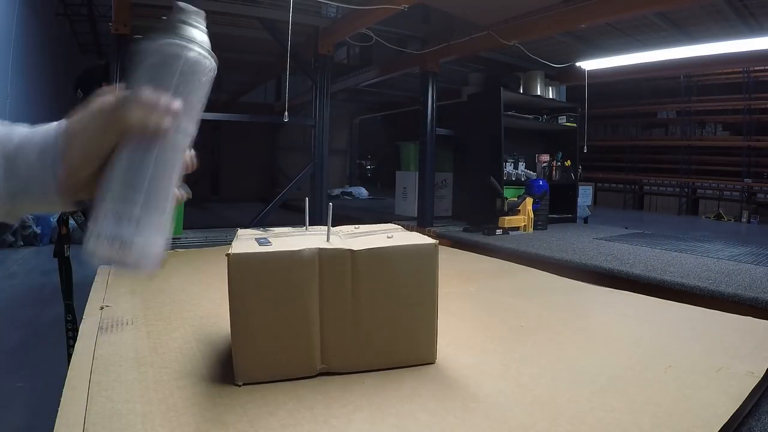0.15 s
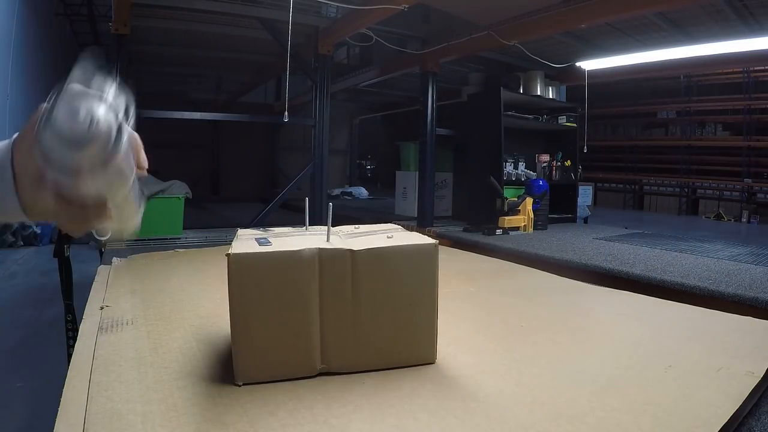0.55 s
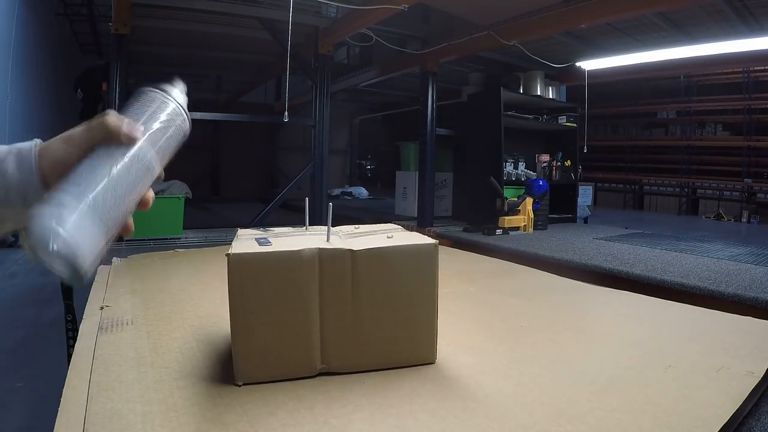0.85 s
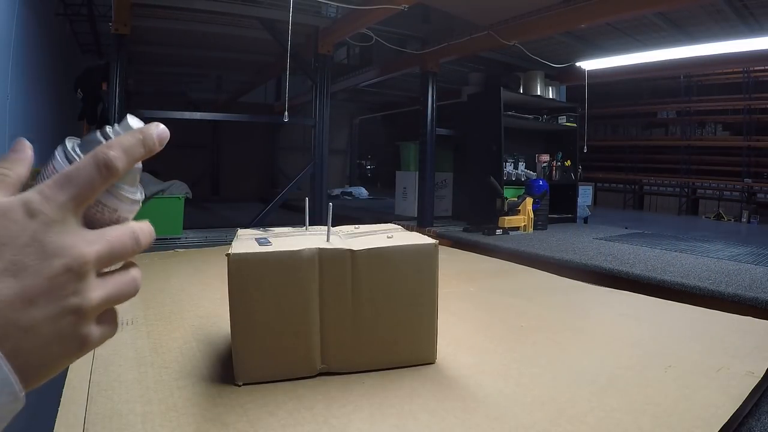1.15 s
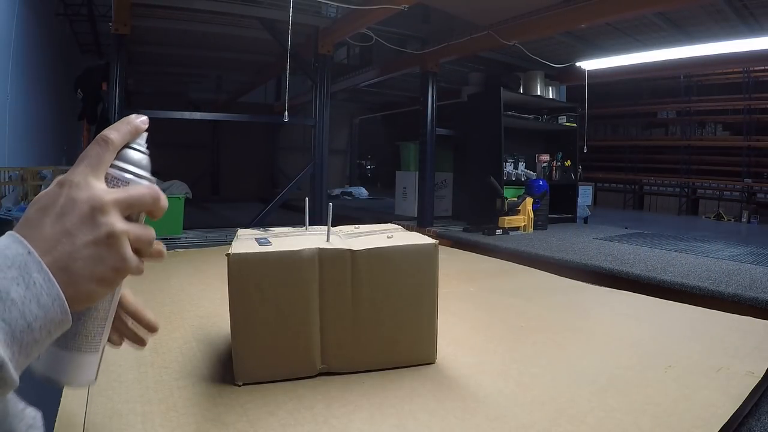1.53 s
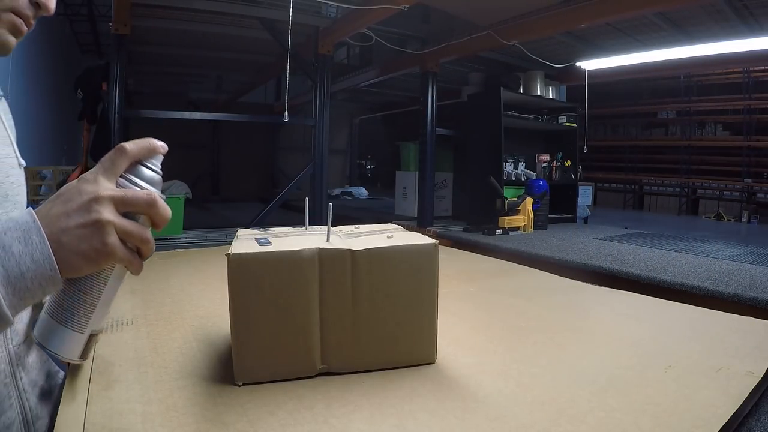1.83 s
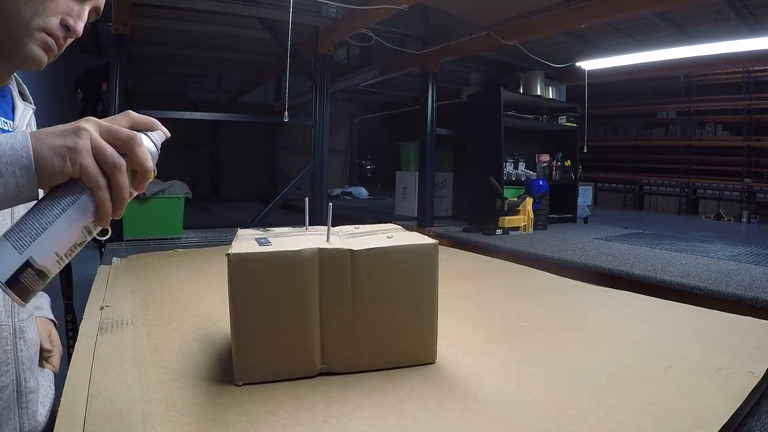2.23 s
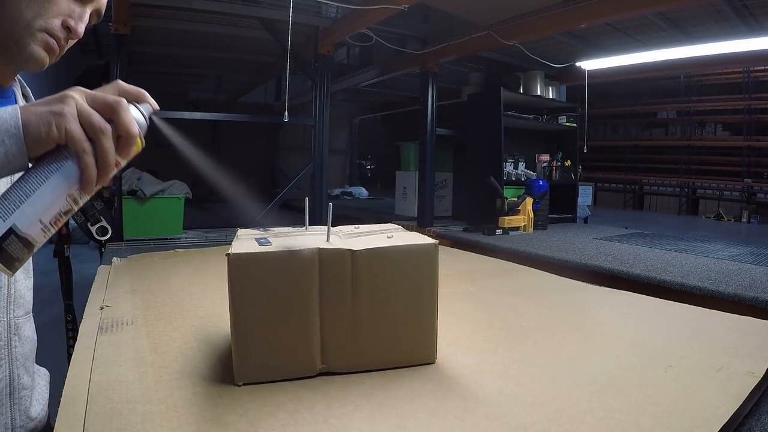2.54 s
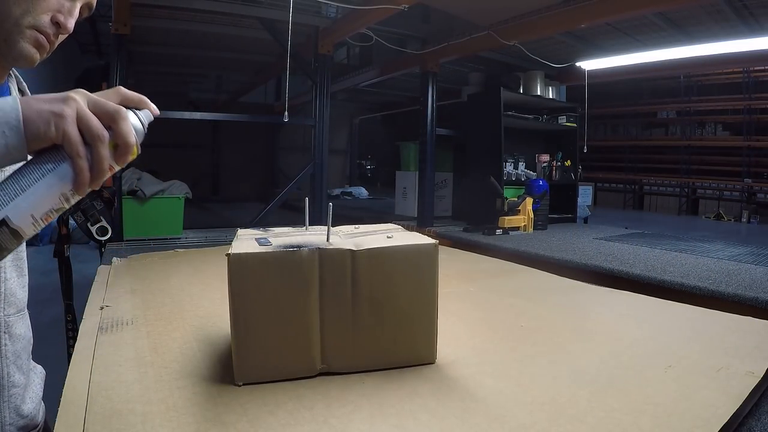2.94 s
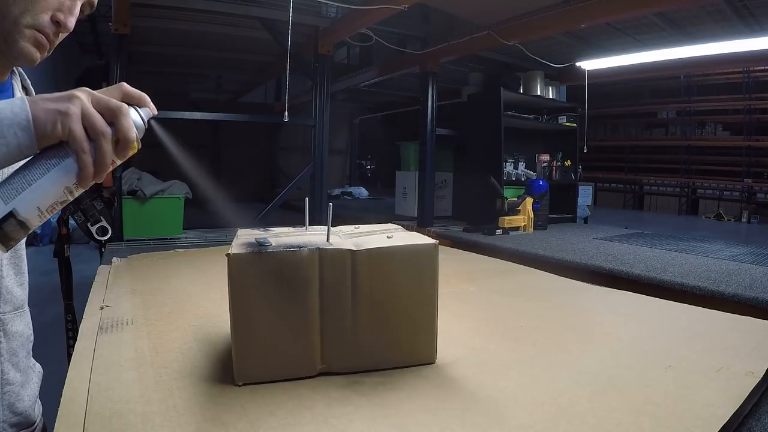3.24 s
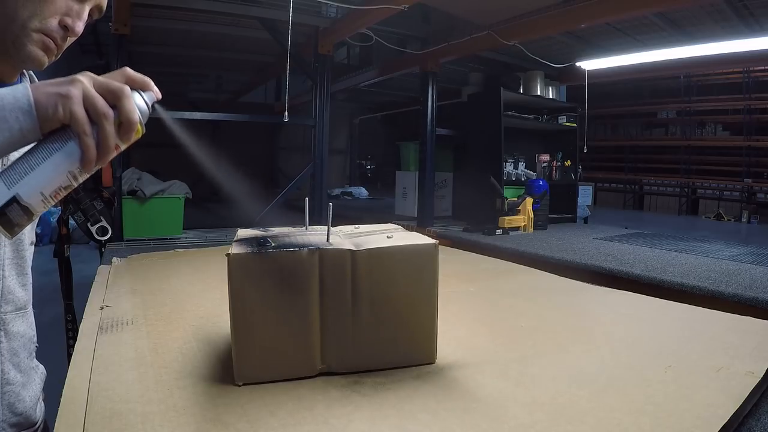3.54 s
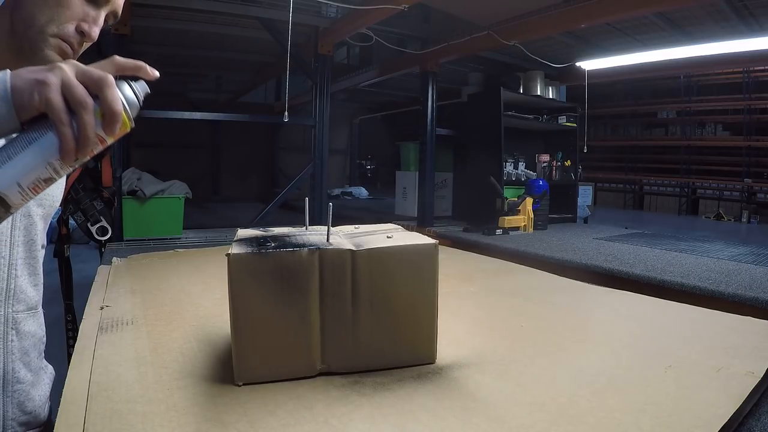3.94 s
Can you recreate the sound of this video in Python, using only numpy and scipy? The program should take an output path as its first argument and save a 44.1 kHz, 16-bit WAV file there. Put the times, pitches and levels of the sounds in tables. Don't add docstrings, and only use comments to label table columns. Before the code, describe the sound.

A close, mono small-camera microphone picks up a spray paint can in a large workshop. From 0 to about 1.1 s the can is shaken hard: a steel ball bangs the domed ends, rim and side in fast irregular clatter, bright and hard, the loudest blows clipping, with wet paint slosh and splash between. The blows are strongest in the first 0.6 s, then thin out. After a short gap, a last cluster of clacks falls at 1.4 s. From 1.5 to 3.1 s the ball rolls lightly, giving high, thin ticks and duller bottom knocks; a sleeve brushes softly around 2.0-2.3 s with a low bump. A short, bright puff of spray comes at 2.6-2.75 s, amid ticks, then a longer rough, airy hiss at 3.2-3.75 s, stopping abruptly. Faint ticks follow near 3.8 and 4.0 s. Low ventilation rumble, slight hum and hiss run throughout, with a faint hall tail.

```python
import sys
import numpy as np
from scipy import signal
from scipy.fft import rfft, irfft
from scipy.io import wavfile
from scipy.ndimage import uniform_filter1d, map_coordinates

SR = 44100
rng = np.random.default_rng(int(sys.argv[2]) if len(sys.argv) > 2 else 0)


def digitize_waveform(pressure):
    field = np.atleast_2d(pressure).T
    bounded = np.clip(field, -1, 1)
    quanta = np.round(bounded * 32767).astype(np.int16)
    wavfile.write(sys.argv[1], SR, quanta)


def ratio_of_db(decibels):
    return 10 ** (np.asarray(decibels, float) / 20)


N = 179833
T = np.arange(N) / SR

# freq_hz, density_db
RUMBLE_SPECTRUM = [(12, -37), (22, 10.5), (35, -2), (55, 0), (80, -8.5), (120, -11), (230, -21.5),
                   (382, -26), (549, -30.5), (788, -33.5), (1450, -45.5), (4000, -77), (15500, -81.5)]
# freq_hz, level_re_rumble_db
HUM_TONES = [(120, -17), (236, -21)]
# freq_hz, density_db
HISS_SPECTRUM = [(800, -4), (2000, -4.5), (5000, -8.5), (6300, -9), (8000, -7), (11000, -11.5),
                 (15500, -20)]
# freq_hz, density_db
CLOTH_SPECTRUM = [(100, 2), (500, 3), (1000, -0.5), (1400, -3.5), (2000, 4), (5000, 0.5), (9000, -3),
                  (15000, -8.5)]
# time_s, level_db
SLEEVE_LEVEL = [
    (1.98, -41.5),
    (2.02, -49),
    (2.1, -40.5),
    (2.16, -39),
    (2.19, -42.5),
    (2.21, -53),
    (2.3, -60),
    (2.38, -74),
]
# freq_hz, density_db
HALL_SPECTRUM = [(100, -6.5), (3000, 0.5), (5000, -3.5), (9000, -19.5), (15000, -33)]
BENCH_SPECTRUM = [(1000, -2.0), (5000, -1.5), (10000, -1.5), (15000, -5.0)]

# freq_hz, density_db
JET_SPECTRUM = [(470, -32), (800, -30.5), (1980, -22), (2380, -19.5), (3050, -22.5), (3540, -18.5),
                (4160, -17), (7010, -4), (9920, -1), (15500, -6.5)]
# time_s, jet_db
PUFF_VALVE = [
    (2.598, -70),
    (2.603, -28),
    (2.612, -12.5),
    (2.63, -17.5),
    (2.7, -15.5),
    (2.738, -19.5),
    (2.752, -27),
    (2.775, -80),
]
SPRAY_VALVE = [
    (3.192, -86),
    (3.197, -36),
    (3.208, -25.5),
    (3.215, -14),
    (3.3, -19),
    (3.4, -19),
    (3.718, -18.5),
    (3.735, -41),
    (3.76, -76),
]

# freq_hz, level_db, t60_s
WALL_LOW_MODES = [(4494, 6, 0.0085), (4466, -8, 0.041), (4590, -6.5, 0.024), (4220, -18.5, 0.023),
                  (4770, -12, 0.03), (6350, -19.5, 0.012)]
WALL_MID_MODES = [(8050, 19, 0.0076), (7880, -3.5, 0.05), (7950, -7.5, 0.13), (8260, -2, 0.045),
                  (12200, 0.5, 0.03), (12050, -9, 0.016), (13280, -4.5, .02)]
WALL_HIGH_MODES = [(9200, 4, 0.0066), (9280, -3, 0.047), (9060, -9, .03), (10000, -12, 0.028),
                   (10400, -13.5, 0.02), (13600, -14, 0.018)]
# freq_hz, level_db, t60_s
BELLY_MODES = [(2950, 0, 0.047), (2805, -1, 0.032), (3100, -17, .03)]
# freq_hz, level_db, t60_s
BODY_HELD_MODES = [(1400, -10, 0.03), (1700, -6, .02), (1950, 7, 0.026), (2135, 4, 0.022), (2350, 0, 0.014),
                   (2800, 1, 0.014), (5300, 0, 0.008)]
# freq_hz, density_db
RASP_SPECTRUM = [(800, -12), (2000, -2.5), (3500, 0), (5500, 0), (8000, -1), (12000, -4), (15000, -9)]
# start_s, low_ring_db, mid_ring_db, high_ring_db
TICKS = [(1.4058, -19, -20, -15), (1.5561, -16, -14, -10.5), (1.6054, -17, -11.5, -16.5),
         (1.6613, -21.5, -15.5, -23), (1.7042, -20.5, -18.5, -16), (1.784, -11.5, -28, -20),
         (1.7882, -34, -35, -32), (1.7953, -43, -33, -31), (1.8503, -18, -22, -27.5),
         (1.8602, -43, -30, -35), (1.8982, -22.5, -18, -24), (1.906, -42, -23, -38),
         (1.932, -25, -15, -31.5), (1.9666, -22, -19.5, -32.5), (2.0061, -10, -18, -14.5),
         (2.091, -16.5, -21, -20.5), (2.101, -26, -34, -32), (2.1256, -28, -30, -22),
         (2.136, -32, -38, -38), (2.151, -30.5, -34, -35), (2.1652, -41, -40, -42), (2.174, -42, -45, -45),
         (2.227, -54, -48, -51), (2.234, -52, -46, -50.5), (2.262, -56, -51, -50), (2.29, -56, -50, -50),
         (2.318, -51, -49.5, -50), (2.352, -56, -54, -55), (2.4292, -16, -9.5, -9.5),
         (2.4889, -36, -54, -46.5), (2.569, -17, -11.5, -13), (2.5725, -26, -27, -24),
         (2.578, -32, -27, -26), (2.6696, -33, -10, -27), (2.7214, -18, -12, -33), (2.791, -22, -19, -17.5),
         (2.7948, -39, -24, -23.5), (2.8553, -23.5, -19.5, -17), (2.9097, -20, -22, -18.5),
         (2.969, -30, -29, -21.5), (3.0217, -32, -30, -29.5), (3.0467, -39, -38, -35.5),
         (3.826, -44, -39.5, -53.5), (3.9935, -39, -39.5, -47), (4.0053, -39, -41, -58)]
# start_s, body_db, wall_rings_db
KNOCKS = [(1.6894, -19.5, -22.5), (1.7805, -34, -32), (2.0064, -18, -43), (2.044, -32, -32),
          (2.0562, -32, -37), (2.424, -12.5, -13), (2.5333, -23, -22.5), (2.5922, -23, -22),
          (2.6919, -20.5, -26), (2.77, -23.5, -20.5), (2.829, -24, -29), (2.879, -29, -43),
          (2.95, -29, -35), (2.9783, -31, -29), (3.0111, -32.5, -36), (3.032, -38.5, -50),
          (3.051, -37, -46), (3.066, -42.5, -54), (3.0758, -38, -39), (3.11, -51, -52),
          (3.1975, -28.5, -45.5), (3.809, -45.5, -55), (3.9813, -41.5, -61)]

# multiple_of_ring, level_db, t60_s
DOME_MODES = [(1, 12, 0.0054), (1.005, -13.5, 0.035), (1.1, -14.5, 0.025), (.91, -24.5, 0.13)]
# freq_hz, level_db, t60_s
BODY_SHAKEN_MODES = [(1188, -22.5, 0.16), (1348, -2, 0.028), (1576, 3.5, 0.017), (1876, 14.5, 0.011),
                     (2073, 5.5, 0.0055)]
# freq_hz, level_db, t60_s
CONTACT_MODES = [(5250, -3, 0.0034), (7840, 3, 0.0038), (11600, -8, 0.0012)]
# multiple_of_dent_pitch, level_db, t60_s
DENT_MODES = [(1, 0.5, 0.0061), (1.7, -1, 0.0022), (2.9, -6.5, 0.0011)]
# freq_hz, level_db, t60_s
THUD_MODES = [(331, -3, 0.0098), (500, 0, 0.0097), (810, -2.5, .007), (1333, 2.5, 0.025)]
# freq_hz, density_db
CRACK_SPECTRUM = [(300, -36.5), (900, -8.5), (2500, 5), (5000, 7.5), (8000, -10.5), (11000, 2),
                  (15000, -10)]
# freq_hz, density_db
SLOSH_SPECTRUM = [(300, -16.5), (900, -20.5), (1800, 0), (3100, 3), (4500, 0), (6500, -3.5), (9000, -21),
                  (15000, -57)]
# freq_hz, density_db
SPLASH_SPECTRUM = [(2500, -34), (5000, -10.5), (8000, -2), (11500, -4), (15000, -14)]
# start_s, dome_ring_hz, strength_db, body_db
SQUARE_HITS = [(.0756, 3160, -7.5, -31.5), (.0874, 3100, -4, -16), (.1695, 3210, 2, -26),
               (.287, 3650, -8, -17), (.4054, 3180, 1, -25), (.5339, 3000, -6, -31),
               (.5957, 3510, -17, -34), (.6124, 3100, -10.5, -45), (.736, 3100, -21, -36),
               (.7493, 3590, -14, -20.5), (.7779, 3670, -22, -24), (.8117, 2960, -19.5, -25),
               (.8743, 3140, -0.5, -15.5), (1.0556, 3070, -15.5, -26.5)]
# start_s, dome_ring_hz, strength_db, body_db
REBOUNDS = [(0.1846, 3135, -8.5, -36), (0.19, 3100, -38, -35), (0.4187, 3110, -7, -33),
            (0.6284, 3180, -12, -22.5), (0.6373, 2950, -19.5, -36), (0.644, 2900, -24, -31),
            (0.66, 3100, -26, -47), (0.7561, 3100, -17, -20.5), (.925, 3020, -12, -30),
            (0.9351, 2940, -12, -35), (0.9732, 4100, -27, -28)]
# start_s, dome_ring_hz, strength_db, body_db
RIM_HITS = [(0.0837, 3770, -2.5, -12.5), (0.1136, 2980, -12, -43), (0.1398, 3340, -17, -22.5),
            (0.1522, 2720, -21, -37.5), (0.2001, 3530, -4.5, -26), (0.217, 3100, -15, -48),
            (0.2643, 3190, -3.5, -19.5), (0.269, 2950, -15, -27), (0.3281, 4100, -11, -28),
            (.364, 3330, -9.5, -26), (0.4029, 3250, -19, -25), (0.4278, 3120, -22, -34),
            (0.433, 3100, -17.5, -36.5), (0.45, 3100, -10, -28), (.495, 3650, -5, -41.5),
            (0.5145, 3600, -14, -22), (0.5328, 3040, -12, -23), (0.5643, 3900, -22, -30),
            (.58, 4070, -21, -31), (.59, 3220, -21, -27), (0.7052, 2560, -19, -24.5),
            (0.8338, 3270, -22, -40), (0.8613, 3030, -26, -47), (0.8924, 2970, -12.5, -17),
            (0.9555, 4400, -13, -22), (0.9671, 3880, -22, -35), (1.0045, 3080, -18.5, -32),
            (1.4039, 3040, -9, -22), (1.4165, 2900, -25, -35)]
# start_s, dome_ring_hz, strength_db, body_db
SIDE_HITS = [(0.0466, 2380, -9, -17), (0.0779, 3320, -4.5, -39), (0.1291, 2860, -6.5, -29),
             (.146, 3900, -12, -31), (.2063, 3260, -10, -25), (.2128, 3160, -12, -40),
             (0.2276, 4120, -15, -24), (0.2571, 3650, -7.5, -26), (0.3539, 3320, -15, -31),
             (0.3745, 3400, -8.5, -39), (0.388, 2980, -8, -32), (.464, 3260, -10, -24),
             (0.507, 3630, -3, -32.5), (0.689, 4330, -10.5, -30), (0.7259, 3940, -9.5, -22),
             (0.7945, 2390, -9.5, -22), (0.824, 3020, -16, -41), (0.853, 3550, -16.5, -24),
             (0.9, 2950, -12, -21), (1.0946, 2290, -10.5, -23), (1.127, 2960, -31, -40),
             (1.39, 2440, -11.5, -22), (1.463, 4400, -20, -26)]
# dome_db, crack_db, patter_db
LANDING_OFFSETS = [
    (-1.15, -12, -34.5),
    (1.5, -25, -31),
    (-3.6, 0.4, -35.5),
    (-15, -0.5, -33.5),
]
# start_s, peak_db, dent_pitch_hz
DENTS = [(0.0765, -8, 3230), (0.0807, -5, 5370), (0.1137, -19, 2670), (0.129, -3.5, 4600),
         (0.1403, -9, 3300), (0.1462, -10, 7900), (0.1527, -22, 2840), (0.1775, -28, 3100),
         (0.2068, -10, 3750), (0.2173, -17, 2890), (0.2278, -12, 3570), (0.2573, -12, 10980),
         (0.27, -5, 3830), (0.2741, -20, 3190), (0.296, -24, 3660), (0.3208, -16, 2640),
         (0.3747, -11, 4050), (0.3882, -9, 8100), (0.3957, -19, 2280), (0.4289, -17, 3490),
         (0.495, -8, 4100), (0.4992, -18, 3450), (0.5072, 1.5, 7630), (0.5142, -13, 3600),
         (0.5325, -0.5, 3600), (0.5386, -16, 3100), (0.5806, -23, 3700), (0.584, -27, 3320),
         (0.5958, -13, 4130), (0.5998, -19, 2610), (0.6124, -7.5, 3080), (0.69, -10.5, 3620),
         (0.6993, -15, 3790), (0.705, -27, 1800), (0.7283, -13, 3100), (0.7355, -19, 3960),
         (0.7388, -15, 3450), (0.743, -14, 4050), (0.7496, -6.5, 3300), (0.7952, -10, 4260),
         (0.8249, -23, 3450), (0.8328, -14, 5510), (0.852, -11.5, 3450), (0.9556, -4, 4200),
         (0.961, -13, 3530), (0.9669, -6.5, 3750), (0.972, -20, 4010), (0.9778, -13, 4480),
         (1.004, -23, 3450), (1.0959, -10.5, 7800), (1.4047, -2.5, 3100), (1.409, -10, 8050),
         (1.4189, -18, 2370)]
# start_s, thud_db
JOLTS = [(0.047, -28), (.076, -43), (.084, -28.5), (.1696, -31), (0.2648, -34.5), (0.4072, -33),
         (0.4181, -31), (0.496, -40), (0.5073, -22.5), (0.534, -39), (0.745, -36), (1.0953, -26),
         (1.3905, -34), (1.4043, -31)]
# start_s, slosh_db, splash_db
SURGES = [(.0002, -29, -24), (.024, -31, -34.5), (0.0748, -14, -32.5), (.0834, -37, -35),
          (.1695, -29, -50.5), (.1998, -20, -17.5), (0.2635, -27, -46), (0.288, -18, -42),
          (.3279, -35, -32), (.374, -30.5, -33), (.4284, -26, -30), (0.449, -31, -21), (.495, -40, -22),
          (0.506, -34, -22), (0.514, -29, -42), (0.532, -20, -31), (.58, -40, -27), (0.61, -26, -53),
          (0.664, -34, -37), (.674, -32, -29), (0.6872, -30, -23.5), (0.7054, -48, -37),
          (0.735, -25.5, -20.5), (.7485, -25.5, -48), (0.7776, -26, -31), (.7937, -40, -33),
          (0.8106, -24, -27.5), (0.8723, -27, -31), (0.956, -18.5, -36), (0.966, -33, -22.5),
          (1.3895, -34, -30), (1.4035, -29, -27), (1.414, -37, -32), (1.463, -36, -31)]


def noise(spectrum, size=N):
    hz, db = np.transpose(spectrum)
    f = np.maximum(np.arange(size // 2 + 1) * SR / size, 1)
    gain = ratio_of_db(np.interp(np.log(f), np.log(hz), db))
    y = irfft(rfft(rng.standard_normal(size)) * gain, size)
    return y / y.std()


def curve(table):
    time_s, level_db = np.transpose(table)
    return np.interp(T, time_s, level_db)


def walk(rate_hz):
    hold = int(SR / rate_hz)
    steps = np.repeat(rng.standard_normal(N // hold + 1), hold)
    return 0.653 * uniform_filter1d(steps, hold)[:N]


def fade(t, t60_s):
    return np.exp(-np.log(1000) * t / t60_s)


def rings(start_s, level_db, modes, scale=1, detune=0.013, scatter_db=5.0, rise_s=0.00028, flutter_db=5.5,
          sag=0, size=2048):
    out, t = np.zeros(N + size), np.arange(size) / SR
    hz, mode_db, t60_s = np.transpose(modes)[:, :, None]
    sag_s = 0.0023
    bent_s = t + sag * sag_s * (1 - np.exp(-t / sag_s))
    chance = rng.standard_normal((len(start_s), len(modes), 2 + size // 64))
    for s, db, k, c in zip(start_s, level_db, scale * np.ones(len(start_s)), chance):
        flutter = uniform_filter1d(np.repeat(c[:, 2:], 64, axis=1), 64, axis=1)
        flutter *= np.minimum(t / 0.0011, 1)
        gain = ratio_of_db(mode_db + scatter_db * c[:, :1] + flutter_db * flutter) * fade(t, t60_s)
        mode_hz = k * hz * (1 + detune * c[:, 1:2])
        ring = (gain * np.sin(2 * np.pi * mode_hz * bent_s)).sum(axis=0)
        ring *= (1 - np.exp(-t / rise_s)) * (1 - (t / t[-1]) ** 2)
        first = int(s * SR)
        out[first:first + size] += ratio_of_db(db) * ring / np.abs(ring).max()
    return out[:N]


def bursts(start_s, level_db, t60_s, rise_s=0.00017):
    kicks = np.zeros(N)
    np.add.at(kicks, (start_s * SR).astype(int), ratio_of_db(level_db))
    t = np.arange(SR // 4) / SR
    return signal.fftconvolve(kicks, fade(t, t60_s) * (1 - np.exp(-t / rise_s)))[:N]


def workshop():
    hum = sum(ratio_of_db(db) * np.sin(2 * np.pi * hz * T + 3.1 * walk(6)) for hz, db in HUM_TONES)
    ducked_db = np.interp(T, [0.83, 1.58], [-6.5, 0])
    bump_db = 5.5 * np.exp(-((T - 2.18) / 0.045) ** 2)
    rumble = (noise(RUMBLE_SPECTRUM) + hum) * ratio_of_db(-34 + ducked_db + bump_db)
    hiss = noise(HISS_SPECTRUM) * ratio_of_db(-57)
    brushing = (T > SLEEVE_LEVEL[0][0]) & (T < SLEEVE_LEVEL[-1][0])
    rustle_db = curve(SLEEVE_LEVEL) + 1.2 * walk(90) + 4.0 * walk(500)
    return rumble + hiss + brushing * noise(CLOTH_SPECTRUM) * ratio_of_db(rustle_db)


def room(x):
    hall_db, hall_t60_s = -29, 1.5
    bench_db, bench_t60_s = -18, 0.28
    gap_s = 0.0034
    t = T[:SR]
    hall = noise(HALL_SPECTRUM, SR) * fade(t, hall_t60_s)
    bench = noise(BENCH_SPECTRUM, SR) * fade(t, bench_t60_s)
    tail = ratio_of_db(hall_db) * hall / np.linalg.norm(hall)
    tail += ratio_of_db(bench_db) * bench / np.linalg.norm(bench)
    return signal.fftconvolve(x, tail * (1 - np.exp(-t / gap_s)))[:N]


def nozzle(valve):
    echo_ms = 0.84 + 0.039 * walk(5.7)
    sputter_db = 2.2 * walk(1500) + 0.84 * walk(40)
    jet = noise(JET_SPECTRUM) * ratio_of_db(curve(valve) + sputter_db)

    def late(delay_ms):
        return map_coordinates(jet, [np.arange(N) - delay_ms * SR / 1000], order=3)

    return jet + 0.3 * late(echo_ms) + 0.18 * late(2.6 * echo_ms)


def rolling():
    tick_s, *tick_db = np.transpose(TICKS)
    knock_s, knock_db, knock_wall_db = np.transpose(KNOCKS)
    s = np.append(tick_s, knock_s)
    top_db = np.max(tick_db, axis=0)
    low_db = np.append(tick_db[0], knock_wall_db - 6)
    mid_db = np.append(tick_db[1], knock_wall_db - 7)
    high_db = np.append(tick_db[2], knock_wall_db - 9)
    body_db = np.append(top_db - 25, knock_db)
    crack_db = np.append(top_db - 9.5, knock_db - 10)

    tilt_pitch = np.interp(s, (1.95, 2.3), (0.965, 1.0))
    belly_db = np.interp(s, (1.72, 1.78), (-7, -18.5))
    wall = rings(s, low_db + 3, WALL_LOW_MODES, scatter_db=1, flutter_db=7)
    wall += rings(s, mid_db + 3, WALL_MID_MODES, scale=tilt_pitch, detune=0.012, scatter_db=2.5, flutter_db=4.5)
    wall += rings(s, low_db + belly_db, BELLY_MODES, detune=0.016)
    wall += rings(s, high_db + 2.5, WALL_HIGH_MODES, detune=0.0032, scatter_db=3.5, flutter_db=5)
    body = rings(s, body_db, BODY_HELD_MODES, detune=0.028, rise_s=0.00026, flutter_db=5, sag=0.17)

    crack_env = bursts(s, crack_db + 8, 0.0021) + bursts(s, crack_db - 12.5, 0.11)
    crack = crack_env * noise(CRACK_SPECTRUM)
    rasp_env = bursts(knock_s, knock_db - 6.5, 0.042, rise_s=0.0004)
    rasp = rasp_env * noise(RASP_SPECTRUM) * ratio_of_db(3.9 * walk(900))
    return wall + body + crack + rasp


def shaking():
    kinds = [SQUARE_HITS, REBOUNDS, RIM_HITS, SIDE_HITS]
    s, ring_hz, strength_db, body_db = np.concatenate(kinds).T
    offsets_db = np.repeat(LANDING_OFFSETS, [len(kind) for kind in kinds], axis=0).T
    dome_db, crack_db, patter_db = strength_db + offsets_db

    steel = rings(s, dome_db + 2.5, DOME_MODES, scale=ring_hz, detune=0.006, scatter_db=1.5, rise_s=0.0005)
    steel += rings(s, body_db, BODY_SHAKEN_MODES, detune=0.072, rise_s=0.00096)
    steel += rings(s, crack_db - 5, CONTACT_MODES, detune=0.15, rise_s=0.00008, scatter_db=4.5, size=256)
    dent_s, dent_db, dent_hz = np.transpose(DENTS)
    steel += rings(dent_s, dent_db - 2.5, DENT_MODES, scale=dent_hz, detune=0.03, rise_s=0.0001,
                   scatter_db=2, flutter_db=0, size=256)
    thuds = rings(*np.transpose(JOLTS), THUD_MODES, detune=0.052, size=1024)
    crack_env = bursts(s, crack_db - 12, 0.013) + bursts(s, crack_db - 15.5, 0.018)
    crack = crack_env * noise(CRACK_SPECTRUM)

    surge_s, slosh_db, splash_db = np.transpose(SURGES)
    wet_s = np.append(surge_s, s)
    slosh_env = bursts(wet_s, np.append(slosh_db, patter_db), 0.091, rise_s=0.0014)
    splash_env = bursts(wet_s, np.append(splash_db, crack_db - 20.5), 0.057, rise_s=0.008)
    patter = ratio_of_db(6.5 * walk(600) - 1.5)
    paint = patter * (slosh_env * noise(SLOSH_SPECTRUM) + splash_env * noise(SPLASH_SPECTRUM))
    return steel + thuds + crack + paint


def scene():
    can = nozzle(PUFF_VALVE) + nozzle(SPRAY_VALVE) + rolling() + shaking()
    mid = workshop() + room(can) + can
    return np.array([mid, mid])


def top_cut(x):
    return signal.sosfilt(signal.butter(12, 16460, fs=SR, output="sos"), x)


def record(dry):
    low_pass = signal.ellip(10, 0.2, 44, 15270, fs=SR, output="sos")
    x = signal.sosfilt(low_pass, np.clip(dry, -1, 1))
    return top_cut(np.clip(x, -1, 1))


dry = scene()
out = record(dry)
digitize_waveform(out)
```